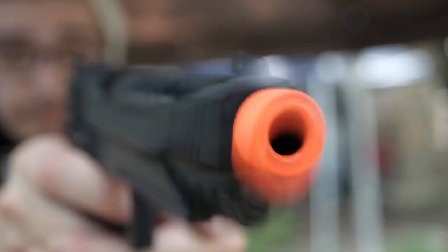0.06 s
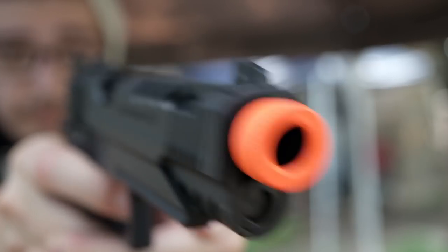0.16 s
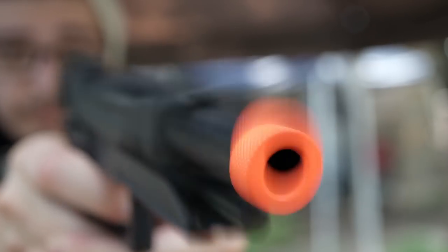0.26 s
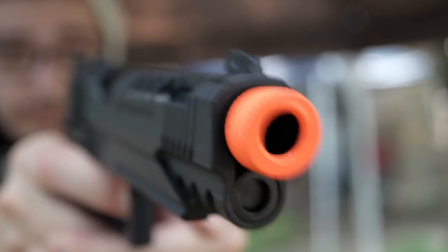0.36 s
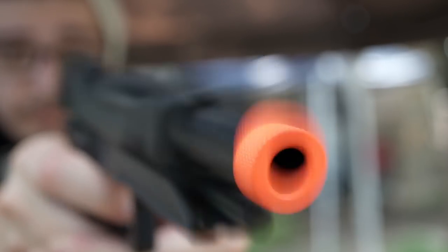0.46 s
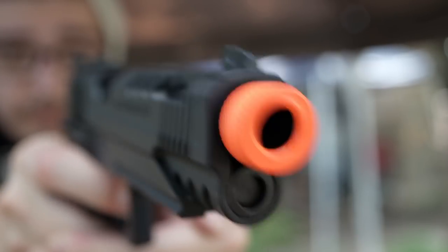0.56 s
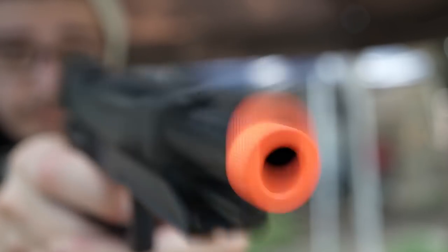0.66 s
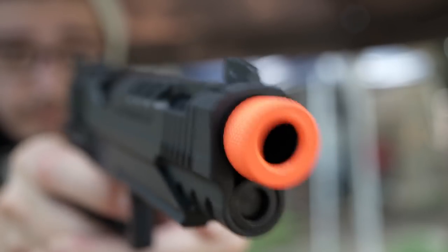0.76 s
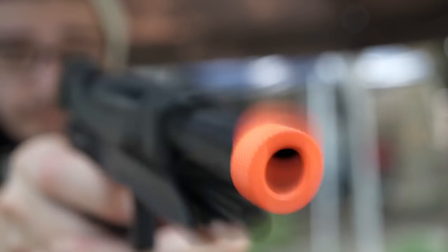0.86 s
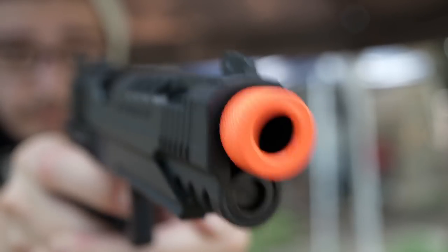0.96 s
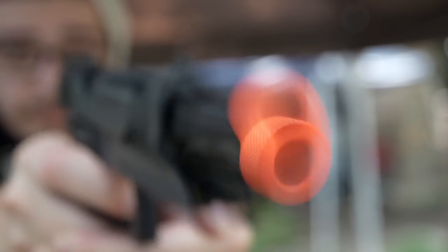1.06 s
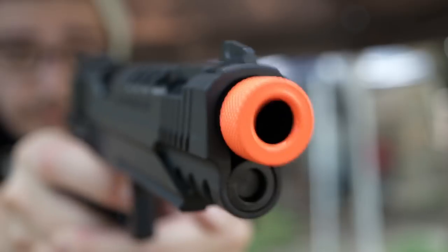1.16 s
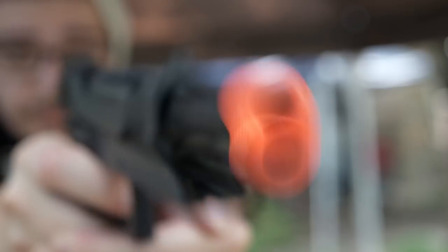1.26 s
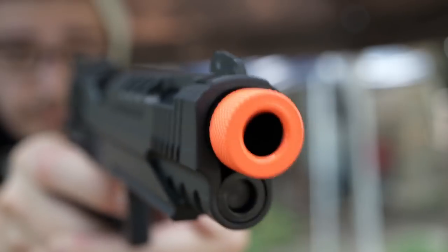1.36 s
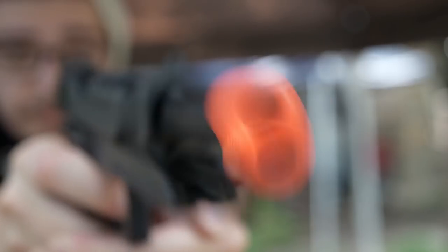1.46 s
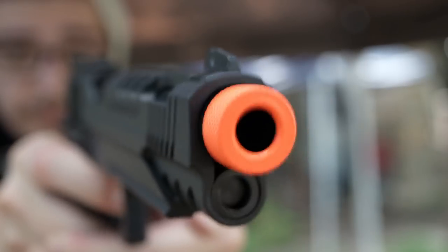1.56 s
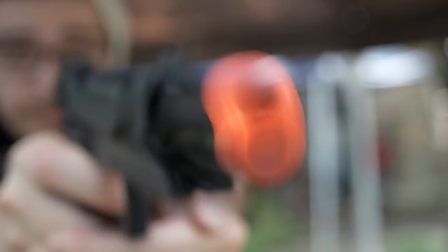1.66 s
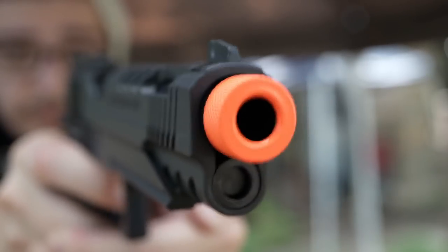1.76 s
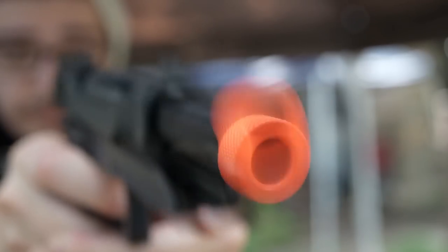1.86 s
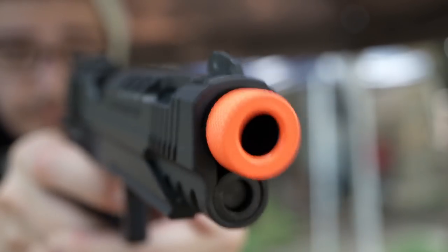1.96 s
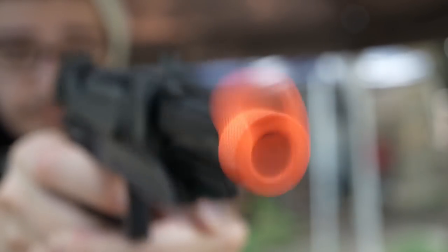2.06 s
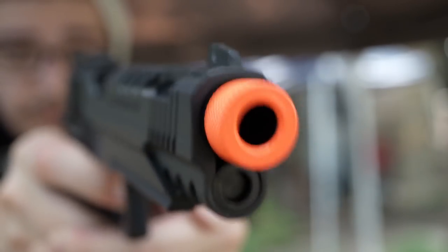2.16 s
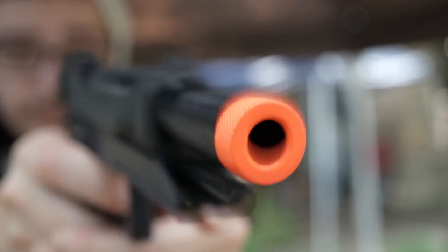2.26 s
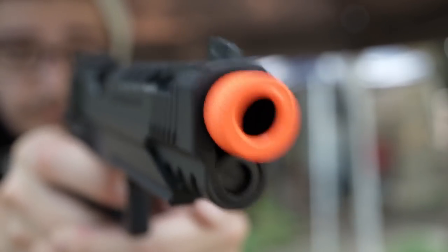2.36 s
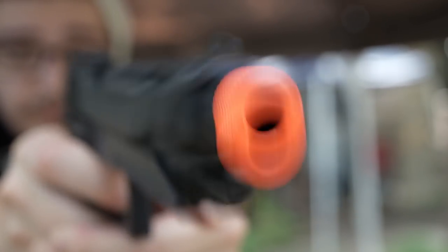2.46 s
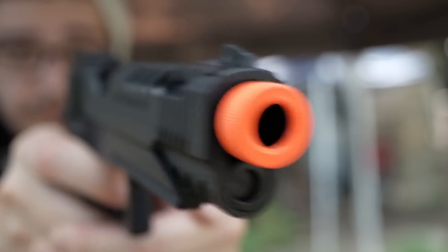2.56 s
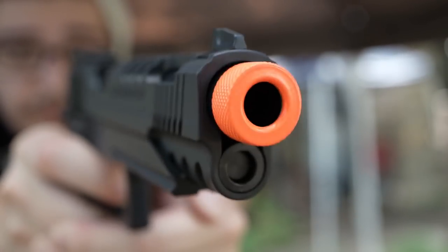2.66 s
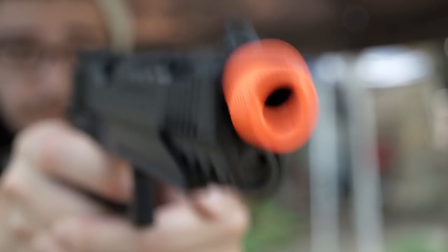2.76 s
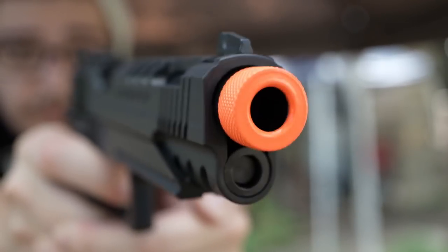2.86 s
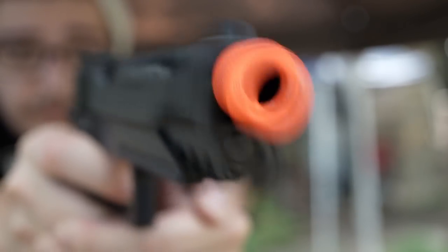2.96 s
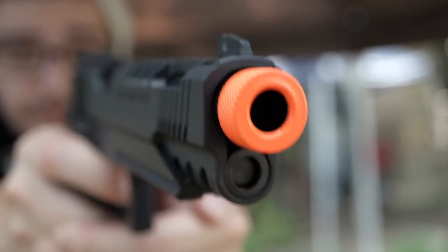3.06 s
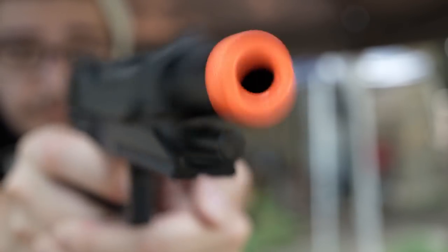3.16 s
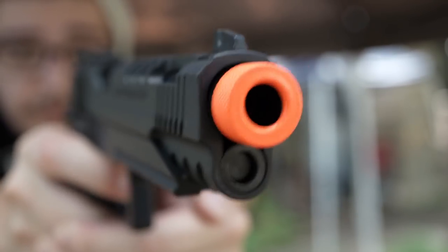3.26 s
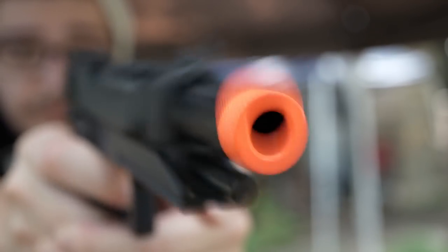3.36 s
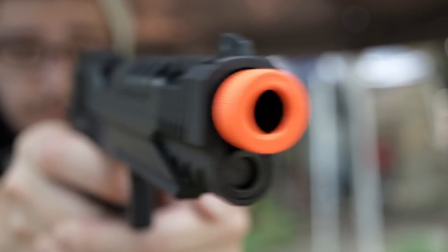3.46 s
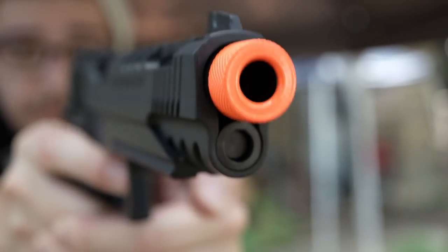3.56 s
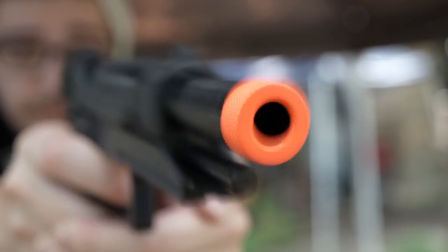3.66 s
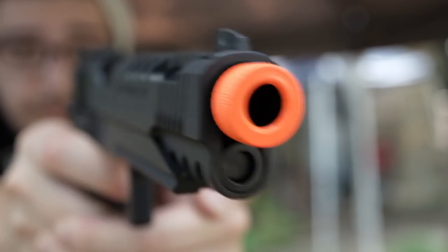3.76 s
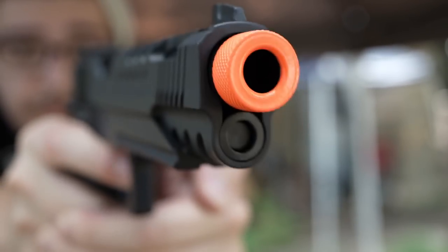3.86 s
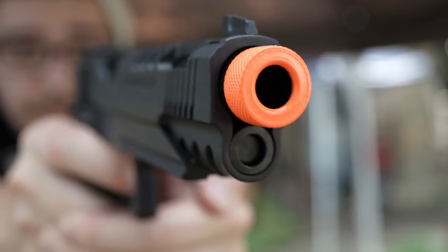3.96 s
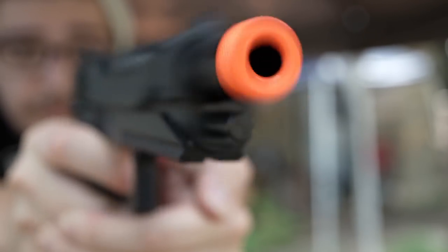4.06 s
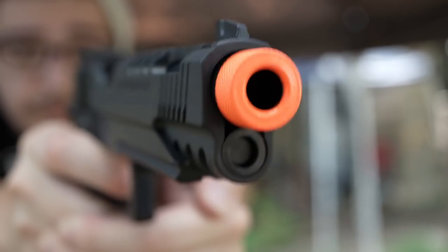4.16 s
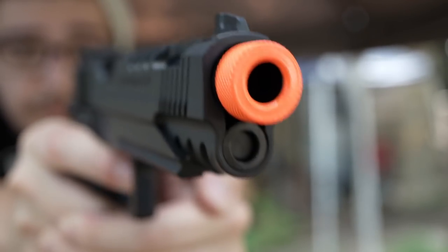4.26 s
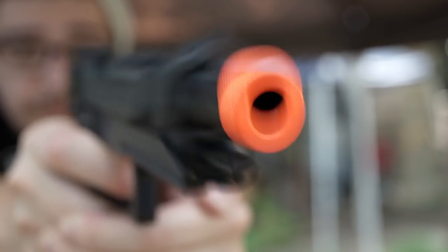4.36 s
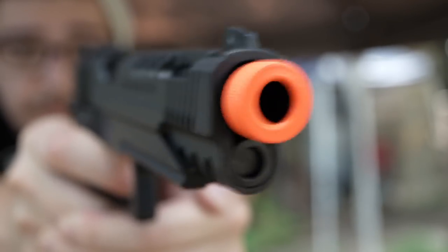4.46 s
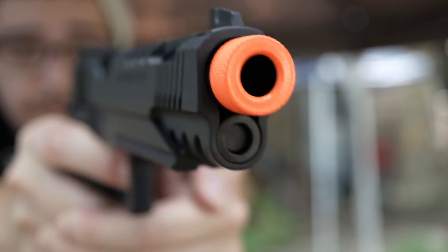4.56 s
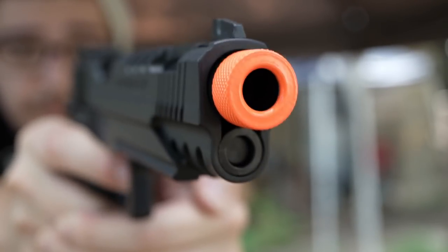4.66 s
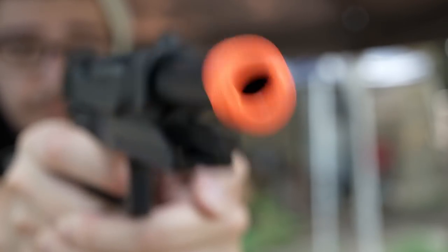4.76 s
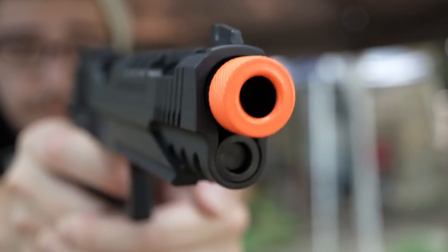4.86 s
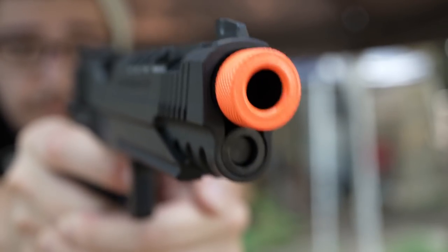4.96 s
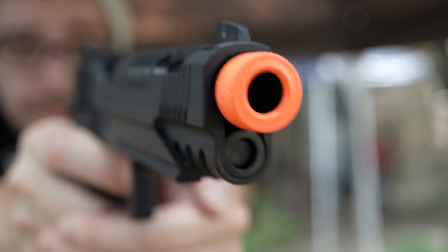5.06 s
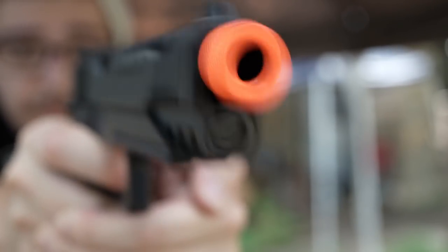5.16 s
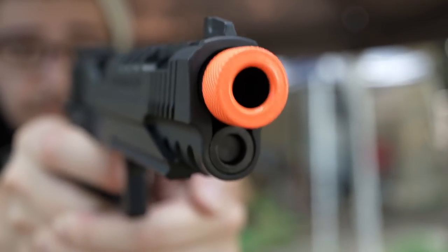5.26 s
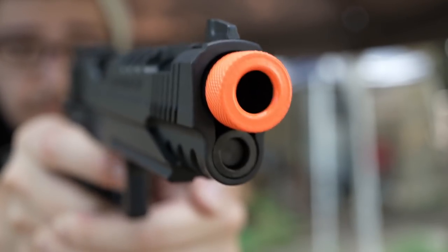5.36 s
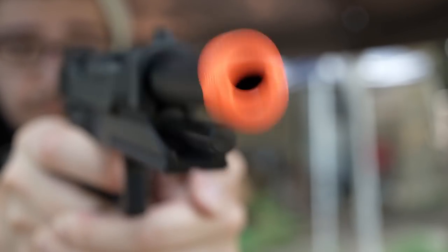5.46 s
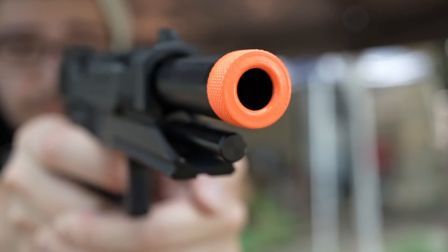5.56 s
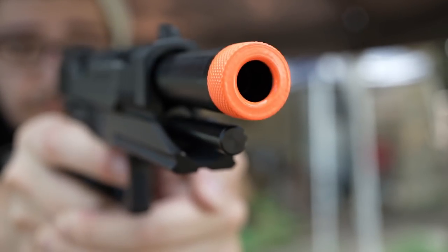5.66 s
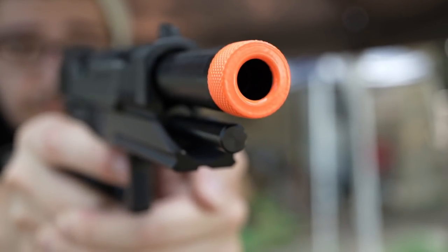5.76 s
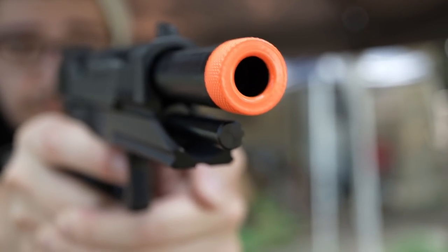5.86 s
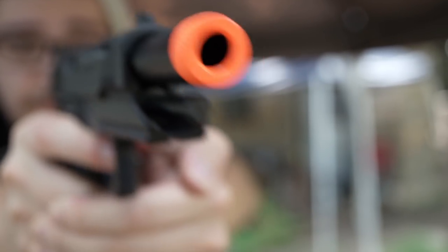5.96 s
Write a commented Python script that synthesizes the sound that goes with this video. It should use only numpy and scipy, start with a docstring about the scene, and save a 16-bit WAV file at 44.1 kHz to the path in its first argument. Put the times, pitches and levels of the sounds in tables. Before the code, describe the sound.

A gas blowback airsoft pistol fires a rapid string of about two dozen shots close to the microphone. Each is a sharp crack of gas with a metallic clack of the slide, a brief hiss and a small trigger click. The pace slows and the shots weaken in the second half, and the last one catches the slide open. The place is outdoors, with a short echo and a very faint low rumble.

```python
"""A gas blowback pistol fires close by, outdoors under a roof edge. At each shot the trigger and hammer
tick, expanding gas cracks from the muzzle, and the slide clacks back and home, ringing in its modes over
a hiss of gas and rails; then the trigger resets. The cycle slows and weakens as the gas cools, and the
last shot leaves the slide open. Walls and roof reverberate; a faint rumble and drone lie behind."""
import sys
import numpy as np
from scipy import signal
from scipy.fft import rfft, irfft, next_fast_len
from scipy.io import wavfile

SR = 44100
rng = np.random.default_rng(int(sys.argv[2]) if len(sys.argv) > 2 else 0)


def unload_audio(sound):
    """Save the sound as a 16-bit wav file, at the path given as the first command line argument."""
    columns = np.transpose(np.atleast_2d(sound))
    # keep every value between -1 and 1, then stretch to whole-number steps
    steps = np.round(np.clip(columns, -1, 1) * 32767)
    wavfile.write(sys.argv[1], SR, steps.astype(np.int16))


N = 265359
FFT_SIZE = next_fast_len(N + SR // 4)
BIN_HZ = np.maximum(np.fft.rfftfreq(FFT_SIZE, 1 / SR), 1)

# the pistol fires: t/s, crack level/dB, hammer level/dB, muzzle puff level/dB
FIRINGS = [(0.1462, -13.5, -22, -21), (.334, -12, -22, -16), (0.5323, -12, -24.5, -15),
           (0.7343, -13, -26, -21), (0.9297, -14, -31, -22.5), (1.121, -13.5, -26, -22),
           (1.3192, -13.5, -24, -19), (1.5165, -13, -26.5, -22.5), (1.717, -14, -28.5, -17),
           (1.9216, -14, -26.5, -17.5), (2.1205, -13.5, -22.5, -17), (2.3269, -13.5, -26.5, -18.5),
           (2.543, -14, -23, -17.5), (2.7639, -14, -26.5, -20.5), (2.9769, -13.5, -24.5, -19.5),
           (3.1959, -14, -27.5, -19), (3.4341, -14, -26.5, -21.5), (3.7273, -16, -25, -20.5),
           (4.0862, -17.5, -27.5, -21), (4.4363, -18, -29, -26.5), (4.807, -18.5, -26, -20.5),
           (5.1689, -18.5, -26, -24.5), (5.5086, -16.5, -26.5, -20.5)]
# the barrel unlocks and gas vents: t/s, clack level/dB, puff level/dB
UNLOCKINGS = [(0.1576, -11, -21), (0.3452, -13.5, -24.5), (0.5447, -16.5, -26.5), (.746, -17, -20.5),
              (0.9416, -15.5, -19), (1.1338, -18.5, -23), (1.3319, -17.5, -26), (1.5291, -18, -22.5),
              (1.7294, -17.5, -20.5), (1.9344, -13.5, -25), (2.1337, -14.5, -26.5), (2.3408, -15, -24.5),
              (2.557, -13, -23), (2.779, -13, -22), (2.9914, -13.5, -20.5), (3.211, -16.5, -19),
              (3.449, -18.5, -23.5), (3.7423, -17, -26), (4.1013, -22, -25.5), (4.452, -19, -21.5),
              (4.822, -17, -23.5), (5.1847, -18, -24.5), (5.5238, -16.5, -25)]
# the slide hits its rear stop, faintly or not at all once the gas is weak: t/s, level/dB
REAR_IMPACTS = [(0.1668, -11.5), (0.3546, -15), (0.555, -12.5), (0.7559, -13), (.9522, -12.5),
                (1.1455, -13.5), (1.3431, -14.5), (1.5423, -15.5), (1.742, -16), (1.9485, -16),
                (2.148, -18), (2.3553, -15.5), (2.5721, -18), (2.7952, -18.5), (3.009, -16), (3.23, -21.5),
                (4.8505, -33), (5.219, -33), (5.5436, -24)]
# the slide closes: t/s, touch level/dB, slam level/dB, puff level/dB
SLIDE_CLOSINGS = [(.009, -6.5, -15.5, -24), (0.2038, -6.5, -14, -27.5), (0.3907, -13.5, -7.5, -29.5),
                  (.591, -12.5, -8, -23), (0.792, -7.5, -11.5, -21), (.989, -13.5, -9, -27),
                  (1.184, -16, -11, -29), (1.3813, -8.5, -15.5, -25.5), (1.5806, -11.5, -12, -21.5),
                  (1.7808, -9.5, -12.5, -20.5), (1.9883, -9.5, -12, -24.5), (2.1885, -10, -12, -22),
                  (2.397, -9.5, -14, -23.5), (2.6115, -11.5, -15.5, -21), (2.837, -11.5, -13, -17.5),
                  (3.0508, -10, -17, -22.5), (3.2724, -8, -16.5, -21.5), (3.515, -10, -13, -25.5),
                  (3.8104, -11, -14.5, -20), (4.168, -9, -15.5, -24), (4.5195, -10, -20, -25.5),
                  (4.8896, -10.5, -15.5, -20.5), (5.2514, -10, -22.5, -27.5)]
# the empty magazine catches the slide open: t/s, level/dB, nominal length/ms, treble tilt/dB
SLIDE_CATCH = [(5.5545, -18, 5, 2), (5.5683, -29, 4.7, -3.5)]


def from_db(db):
    """Amplitude ratio of a level."""
    return 10 ** (np.asarray(db) / 20)


def at_bins(curve):
    """A curve of (f/Hz, value) interpolated at every FFT bin on a logarithmic frequency axis."""
    hz, values = np.transpose(curve)
    return np.interp(np.log(BIN_HZ), np.log(hz), values)


def stereo_noise(grain_db):
    """Partially coherent noise: mid and side mixed by frequency, with uneven sample sizes for grain."""
    # likeness of left and right: f/Hz, correlation
    correlation = [(100, 1), (400, 0.13), (1000, 0.17), (2500, 0.5), (6000, 0.48), (15000, 0.37)]
    white = rng.standard_normal((2, N))
    grain = from_db(grain_db * np.clip(rng.standard_normal(N), -2, 2))
    mid, side = rfft(white * grain, FFT_SIZE)
    alike = at_bins(correlation)
    pair = irfft(np.sqrt(1 + alike) * mid + np.sqrt(1 - alike) * side * [[1], [-1]], FFT_SIZE)[:, :N]
    return pair / np.std(pair)


def colour(x, spectrum):
    """Minimum-phase filtering by a folded cepstrum, scaled so that white noise keeps its power."""
    cepstrum = irfft(at_bins(spectrum) * np.log(10) / 20, FFT_SIZE)
    cepstrum[1:FFT_SIZE // 2] *= 2
    cepstrum[FFT_SIZE // 2 + 1:] = 0
    response = np.exp(rfft(cepstrum))
    response /= np.sqrt(np.mean(abs(response) ** 2))
    return irfft(rfft(x, FFT_SIZE) * response, FFT_SIZE)[..., :N]


def transients(times, levels, length, tilt):
    """Rows for bursts(): t/s, level/dB, nominal length/ms, nominal treble tilt/dB."""
    return np.column_stack([times, levels, np.tile((length, tilt), (len(times), 1))])


def bursts(events, spectrum, lead_ms, rise_ms, stretch, tilt_share, grain_db):
    """A brief transient is broadband: a noise burst, tilted between the bands below and above 5.5 kHz."""
    lead_in = SR // 200
    envelopes = np.zeros((2, N + lead_in))
    t_ms = np.arange(-lead_in, SR // 20) * 1000 / SR
    swell = np.where(t_ms < 0, 0.22 * np.exp(t_ms / lead_ms), 1 - 0.62 * np.exp(-t_ms / rise_ms))
    for onset, db, length, tilt in events:
        shape = swell * np.exp(-(np.maximum(t_ms, 0) / (stretch * length)) ** 1.14)
        gains = from_db(db + np.clip(tilt_share * tilt, -15, 13) * np.array([[-.6], [.4]]))
        start = round(onset * SR)
        envelopes[:, start:start + len(t_ms)] += (gains * shape / shape.max())[:, :N + lead_in - start]
    low_envelope, high_envelope = envelopes[:, lead_in:]
    noise = stereo_noise(grain_db)
    low = signal.sosfilt(signal.butter(2, 5500, fs=SR, output="sos"), noise)
    return colour(low * low_envelope + (noise - low) * high_envelope, spectrum)


def ringing(events, modes, gain_db, spread_db, detune, scatter):
    """Free vibration: each blow excites damped modes with random strength, detuning, sign and side."""
    out, t = np.zeros((2, N)), np.arange(SR // 12) / SR
    hz, db, t60 = np.transpose(modes)[:, :, None]
    draws = rng.standard_normal((len(events), 4, len(modes), 1))
    for (onset, blow_db, *_), (size, shift, turn, side) in zip(events, draws):
        decay = from_db(blow_db + db + gain_db + spread_db * size - 60 * t / t60)
        attack = 1 - np.exp(-t * hz)   # the contact lasts about one cycle
        waves = attack * decay * np.sin(2 * np.pi * hz * (1 + detune * shift) * t)
        channel_gains = np.cos(scatter * np.array([turn, turn + side]))[..., 0]
        start = round(onset * SR)
        out[:, start:start + len(t)] += (channel_gains @ waves)[:, :N - start]
    return out


def distant_rumble():
    """Ambient noise: a steady outdoor rumble with its power at low frequencies."""
    # rumble spectrum: f/Hz, relative density level/dB
    spectrum = [(15, -55.5), (25, -25.5), (40, -3.5), (64, -22.5), (84, -26), (149, -18), (270, -25.5),
                (531, -25), (818, -20), (3250, -38.5), (16000, -42)]
    return from_db(-78) * colour(stereo_noise(grain_db=3.5), spectrum)


def distant_drone(hz, width_hz):
    """Narrow-band noise: neighbouring frequencies beat, so the far drone wavers."""
    # slow drift of the drone: t/s, level/dB
    drift = [(0, -62), (1.5, -72), (3.0, -78.5), (3.599, -73.5), (4.399, -67.5), (4.899, -72.5), (5.3, -85),
             (6.02, -79)]
    band = signal.butter(2, [hz - width_hz / 2, hz + width_hz / 2], "band", fs=SR, output="sos")
    drone = signal.sosfilt(band, stereo_noise(grain_db=0.4))
    return drone / np.std(drone) * from_db(np.interp(np.arange(N) / SR, *np.transpose(drift)))


def gas_and_rails(sag_db_per_s, closing_ms, fade_ms):
    """Turbulence and friction: vented gas and rails hiss as the slide travels, and anew as it closes."""
    # hiss spectrum: f/Hz, relative density level/dB
    spectrum = [(290, -29), (500, -11), (974, -14), (1230, -2.5), (3250, -4), (5710, -6), (10800, -4),
                (16000, -10)]
    travel, closing, t = np.zeros(N), np.zeros(N), np.arange(N) / SR
    departures = [0] + [row[0] for row in FIRINGS]
    arrivals = [row[0] for row in SLIDE_CLOSINGS] + [SLIDE_CATCH[0][0]]
    for start, rest in zip(departures, arrivals):
        db = -29.5 - 1.7 * start   # the gas cools and weakens
        strip = max(rest - closing_ms / 1000, start)
        travel += from_db(db - sag_db_per_s * np.clip(t - start, 0, 1)) * (t > start) * (t < strip)
        closing += from_db(db - 0.5) * (t >= strip) * np.exp(-np.clip(t - rest, 0, 1) * 1000 / fade_ms)
    noise = stereo_noise(grain_db=2.0)
    # the vented gas also flutters low, fading more slowly than the hiss
    flutter_band = signal.butter(2, [90, 305], "band", fs=SR, output="sos")
    flutter = from_db(-11) * signal.sosfilt(flutter_band, noise * np.sqrt(travel))
    return colour(noise * (travel + closing), spectrum) + flutter


def slide_impacts():
    """Collisions of the slide: unlock, rear stop, strip, seat, touch, slam; play makes the parts rattle."""
    # the slide strips a pellet and seats it: t/s, strip level/dB, seating level/dB
    pellet_feeds = [(0.1816, -17.5, -17), (0.3706, -17.5, -17), (.5707, -23, -21.5), (.7715, -21.5, -20.5),
                    (0.9686, -25, -18), (1.163, -16.5, -15.5), (1.3608, -20.5, -29), (1.561, -15, -19),
                    (1.7589, -19, -27), (1.966, -17.5, -22.5), (2.166, -17, -22), (2.374, -16, -21.5),
                    (2.5906, -17, -19.5), (2.815, -17, -26.5), (3.0286, -16.5, -28), (3.251, -17.5, -25),
                    (3.4931, -18, -24), (3.7861, -18.5, -18), (4.1457, -19.5, -22.5), (4.4966, -17.5, -17),
                    (4.867, -19, -23), (5.2278, -17.5, -24)]
    unlock, rear, feed, close = map(np.transpose, (UNLOCKINGS, REAR_IMPACTS, pellet_feeds, SLIDE_CLOSINGS))
    seat_delay_ms, slam_delay_ms = 12.5, 4.0
    rows = [transients(unlock[0], unlock[1], length=4.2, tilt=-6),
            transients(rear[0], rear[1], length=2.4, tilt=14),
            transients(feed[0], feed[1], length=1.7, tilt=15),
            transients(close[0], close[1], length=3.56, tilt=-.6),
            transients(feed[0] + seat_delay_ms / 1000, feed[2], length=4.7, tilt=5.6),
            transients(close[0] + slam_delay_ms / 1000, close[2], length=4.2, tilt=-1.5),
            SLIDE_CATCH]
    # lighter contacts: leading impact, delay/ms, relative level/dB, nominal length/ms, treble tilt/dB
    rattles = [(unlock, 7.5, -13.5, 0.5, 5.5), (rear, 7.5, -15, 1.5, 8.5), (close, 10.5, -17.5, 5, 7.5),
               (feed, 3.0, -8, 2.4, 7), (feed, 8.4, -6, 1.8, 6.6)]
    jitter_ms, spread_db = 0.32, 2
    for (times, levels, *_), delay_ms, relative_db, length, tilt in rattles:
        late, loud = rng.standard_normal((len(times), 2)).T
        onsets = times + (delay_ms + jitter_ms * late) / 1000
        rows.append(transients(onsets, levels + relative_db + spread_db * loud, length, tilt))
    return np.vstack(rows)


def slide_clacks(impacts):
    """Impact noise: each abrupt collision of the slide radiates a broadband clack."""
    # clack spectrum: f/Hz, relative density level/dB
    spectrum = [(240, -30.5), (400, -5.5), (1130, -7), (1790, -4.5), (2880, -5.5), (4510, -2.5),
                (5110, -3.5), (12500, -2.5), (13500, -3), (16000, -8)]
    return from_db(-2.5) * bursts(impacts, spectrum, lead_ms=0.45, rise_ms=0.11, stretch=0.72,
                                  tilt_share=1.0, grain_db=-0.5)


def slide_ring(impacts):
    """Modal vibration: shots and impacts ring the slide and frame; a faint ping follows each closing."""
    # modes of slide and frame: f/Hz, level/dB, T60/s
    metal_modes = [(1890, -10.5, 0.081), (4260, -14, 0.061), (4620, 0, .055), (4720, 1.5, 0.046),
                   (7550, -10.5, .08), (8200, -5, 0.05), (9400, -3.5, 0.072), (10500, -11, .06),
                   (11700, -12.5, 0.045), (13100, -13, .035)]
    # modes of the ping, perhaps the recoil spring settling: f/Hz, level/dB, T60/s
    ping_modes = [(4340, 0, .014), (1950, -5, .014)]
    ping_delay_ms = 58
    closings = np.array([(onset, max(touch, slam)) for onset, touch, slam, _ in SLIDE_CLOSINGS])
    pings = closings + [ping_delay_ms / 1000, 0]
    return (ringing([*FIRINGS, *impacts], metal_modes, gain_db=-23, spread_db=4, detune=.008, scatter=1.5)
            + ringing(closings, metal_modes, gain_db=-18, spread_db=3, detune=.012, scatter=.6)
            + ringing(pings, ping_modes, gain_db=-30.5, spread_db=2.5, detune=.015, scatter=.4))


def air_puffs(width_ms, lead_ms, rebound_ms, rebound_db, sway_ms, sway_db):
    """Displaced air radiates a pulse: suction, push and slower rebound, uneven between the two sides."""
    # source, delay/ms, gain/dB, suction level re push/dB
    sources = [(FIRINGS, 4.4, 0, -23.5), (UNLOCKINGS, 1.84, 0, -4), (SLIDE_CLOSINGS, 7.6, 0, -13.5),
               (REAR_IMPACTS, 3.8, -13.5, -14.5)]
    push, rebound = np.zeros((2, 2, N))
    for events, delay_ms, gain_db, suction_db in sources:
        for onset, *_, db in events:
            late, loud = rng.standard_normal(2)
            for side, sign in enumerate((1, -1)):
                arrival = onset + (delay_ms + sign * late * sway_ms) / 1000
                size = from_db(db + gain_db + sign * loud * sway_db)
                push[side, round(arrival * SR)] += size
                push[side, round((arrival - lead_ms / 1000) * SR)] -= size * from_db(suction_db)
                rebound[side, round((arrival + rebound_ms / 1000) * SR)] -= size * from_db(rebound_db)
    t_ms = np.arange(-SR // 100, SR // 100 + 1)[None] * 1000 / SR
    narrow, wide = [np.exp(-(t_ms / ms) ** 2) for ms in (width_ms, 2.53 * width_ms)]
    pressure = signal.fftconvolve(push, narrow, "same") + signal.fftconvolve(rebound, wide, "same")
    return from_db(-1.5) * pressure


def trigger_reset():
    """Impact and resonance: the trigger springs back over the sear with a click, and its parts ring."""
    # trigger resets: t/s, level/dB
    resets = [(.0485, -25.5), (0.4338, -27.5), (.636, -27), (0.8314, -29), (1.0328, -28.5), (1.2254, -29),
              (1.4278, -28), (1.624, -28), (1.8342, -29.5), (2.0353, -29), (2.2389, -29.5), (2.4489, -33),
              (2.6717, -30.5), (2.8882, -29.5), (3.1044, -30.5), (3.3397, -28.5), (3.5904, -30.5),
              (3.8997, -29), (4.2896, -30), (4.6031, -27), (5.0332, -28), (5.36, -27.5), (5.6816, -27)]
    # click spectrum: f/Hz, relative density level/dB
    spectrum = [(290, -66), (500, -42), (1510, -17.5), (4530, -3.5), (5710, -7), (7000, -6.5), (16000, -9)]
    # modes of the trigger parts: f/Hz, level/dB, T60/s
    modes = [(1694, -10, .018), (3710, -13, .010), (5590, -2.5, .010), (6060, -2.5, .010),
             (8700, -7.5, .01), (12300, -11, .01)]
    events = transients(*np.transpose(resets), length=2.8, tilt=4.4)
    clicks = bursts(events, spectrum, lead_ms=1.0, rise_ms=0.17, stretch=0.69, tilt_share=0.26, grain_db=-2)
    return from_db(-1.5) * clicks + ringing(resets, modes, gain_db=1, spread_db=2.5, detune=.02, scatter=.2)


def trigger_and_hammer():
    """Light impacts: the trigger ticks through its slack, and the hammer falls just before each shot."""
    # the finger takes up or lets go the slack: t/s, level/dB
    slack_ticks = [(0.1067, -32), (0.2992, -28.5), (.4998, -39.5), (0.6977, -35.5), (0.866, -38),
                   (0.893, -35.5), (0.9195, -35.5), (1.085, -37), (1.238, -35), (1.2809, -38.5),
                   (1.4824, -44), (1.5064, -40), (1.6792, -42.5), (1.707, -36), (2.5126, -47.5),
                   (2.7299, -46), (2.9461, -44), (3.1655, -46.5), (3.4062, -43), (3.702, -44),
                   (4.064, -49.5), (4.4116, -44.5), (4.7814, -45.5), (5.1407, -45), (5.4807, -42),
                   (5.6346, -42.5), (5.6563, -42)]
    # tick spectrum: f/Hz, relative density level/dB
    spectrum = [(290, -63), (500, -22), (3590, -2.5), (4730, -7.5), (5800, -4.5), (13100, -14.5),
                (16000, -13.5)]
    times, _, hammer_db, _ = np.transpose(FIRINGS)
    hammer_lead_ms = 6.95
    events = np.vstack([transients(times - hammer_lead_ms / 1000, hammer_db, length=2.5, tilt=6),
                        transients(*np.transpose(slack_ticks), length=4.8, tilt=-13.5)])
    return from_db(-3.5) * bursts(events, spectrum, lead_ms=1.0, rise_ms=0.36, stretch=.8,
                                  tilt_share=0.16, grain_db=-2)


def muzzle_crack():
    """Sudden expansion: gas cracks from the muzzle in two spurts, and the barrel's air column resonates."""
    # crack spectrum: f/Hz, relative density level/dB
    spectrum = [(240, -16), (400, -2.5), (852, -7.5), (2250, -2), (3810, -5.5), (4380, -6.5), (9610, -7.5),
                (10500, -10.5), (14600, -9.5), (16000, -12.5)]
    # modes of the air in the barrel: f/Hz, level/dB, T60/s
    barrel_modes = [(1977, 9.5, 0.011), (1321, -2, 0.031)]
    times, levels, *_ = np.transpose(FIRINGS)
    first = transients(times, levels, length=2.1, tilt=1.5)
    second = first + [4.32 / 1000, -9.5, 0, 0]   # later and weaker
    crack = bursts(np.vstack([first, second]), spectrum, lead_ms=0.96, rise_ms=0.65, stretch=1.46,
                   tilt_share=0.48, grain_db=3)
    pop = ringing(first, barrel_modes, gain_db=-8, spread_db=1.2, detune=.02, scatter=.3)
    return from_db(0.65) * crack + pop


def reverberation(x, build_ms):
    """Diffuse field: in each band the power builds up and decays, heard as noise unrelated on each side."""
    # echoes from walls and roof: f/Hz, relative level/dB, T60/s
    bands = [(100, -49, 0.23), (400, -47, 0.26), (940, -44.5, 0.23), (2100, -40, 0.4), (4500, -39, 0.31),
             (7950, -40.5, 0.3), (14670, -36.5, .2)]
    echoes, white = 0, rng.standard_normal((2, 2, N))
    build_pole = np.exp(-1000 / (build_ms * SR))
    for k, (hz, db, t60) in enumerate(bands):
        band = signal.butter(2, [hz / 1.5, min(hz * 1.5, 20000)], "band", fs=SR, output="sos")
        decay_pole = from_db(-120 / (t60 * SR))
        feedback = np.convolve([1, -decay_pole], [1, -build_pole])
        power = signal.lfilter([(1 - build_pole) * 100 / SR], feedback, signal.sosfilt(band, x) ** 2)
        noise = signal.sosfilt(band, white[k % 2])   # neighbouring bands get unrelated noise
        echoes += 10 * from_db(db) * np.sqrt(np.maximum(power, 0)) * noise / np.std(noise)
    return echoes


def scene():
    """Superposition of the pistol's direct sound, its reverberation and the distant background."""
    background = distant_rumble() + distant_drone(hz=88, width_hz=28)
    impacts = slide_impacts()
    pistol = gas_and_rails(sag_db_per_s=120, closing_ms=20, fade_ms=24)
    pistol += slide_clacks(impacts) + slide_ring(impacts)
    pistol += air_puffs(width_ms=0.79, lead_ms=1.29, rebound_ms=4.875, rebound_db=-9,
                        sway_ms=0.064, sway_db=2.35)
    pistol += trigger_reset() + trigger_and_hammer() + muzzle_crack()
    return pistol + reverberation(pistol.mean(axis=0), build_ms=9.9) + background


def record(dry):
    """Directivity favours the left microphone in the treble; band limits and saturation follow."""
    # left over right: f/Hz, level difference/dB
    balance = [(100, 0), (1000, 1), (2500, 0), (5000, 3), (15000, 1)]
    gains = from_db(at_bins(balance) / 2 * np.array([[1], [-1]]))
    x = irfft(rfft(dry, FFT_SIZE) * gains, FFT_SIZE)[:, :N]
    x = signal.sosfilt(signal.butter(2, 40, "high", fs=SR, output="sos"), x)
    x = .7 * np.tanh(x / .7)
    top_hz, transition_hz = 16100, 700
    return signal.sosfilt(signal.cheby2(12, 60, top_hz + transition_hz, fs=SR, output="sos"), x)


dry = scene()
out = record(dry)
unload_audio(out)
```